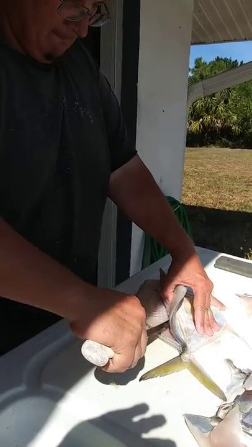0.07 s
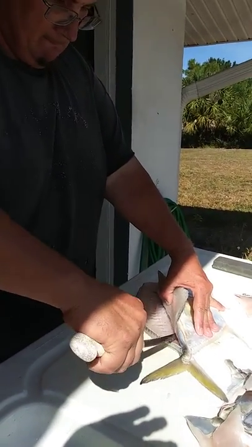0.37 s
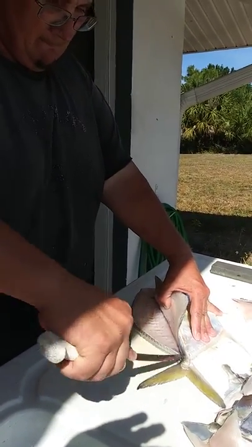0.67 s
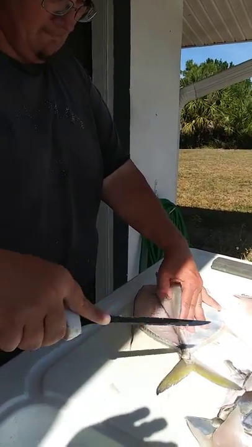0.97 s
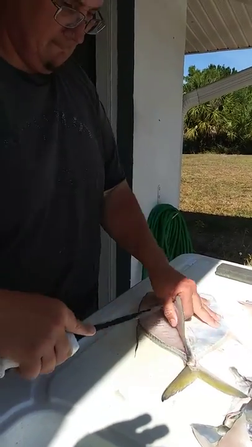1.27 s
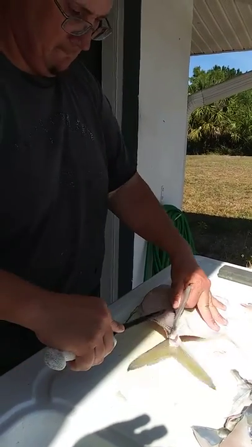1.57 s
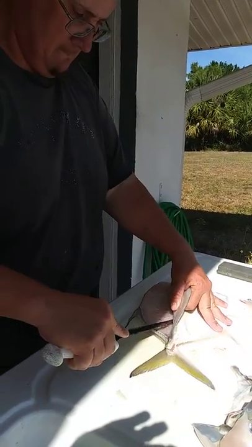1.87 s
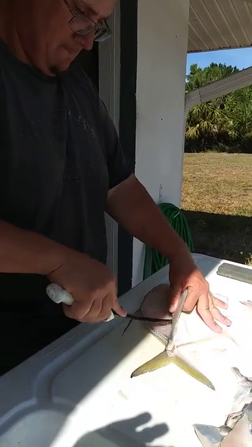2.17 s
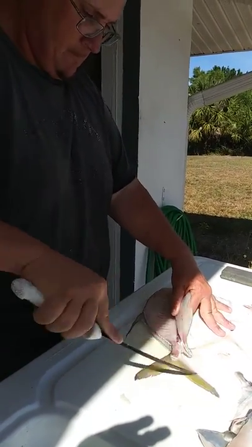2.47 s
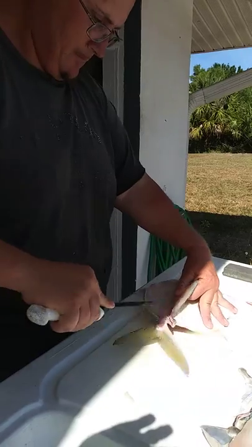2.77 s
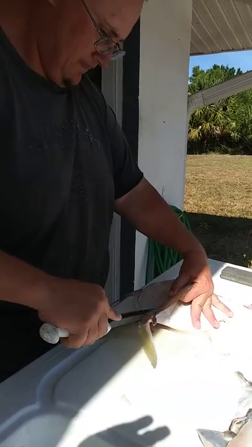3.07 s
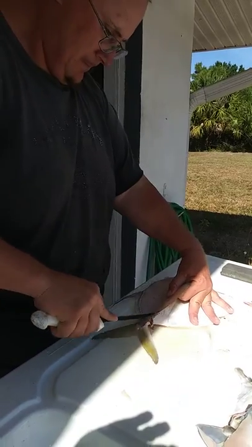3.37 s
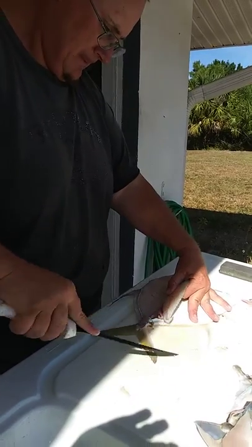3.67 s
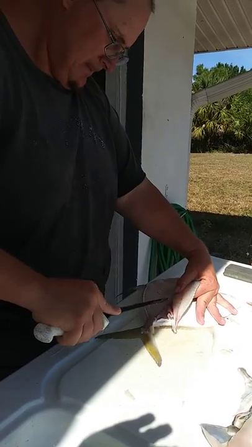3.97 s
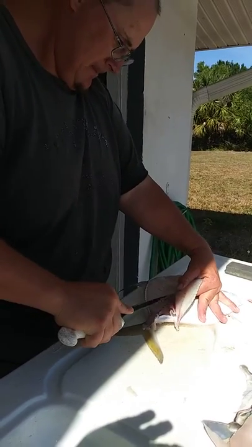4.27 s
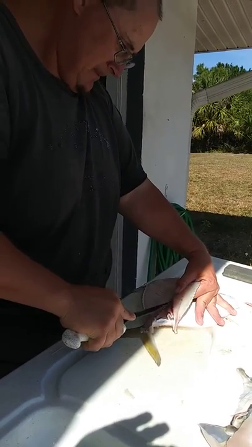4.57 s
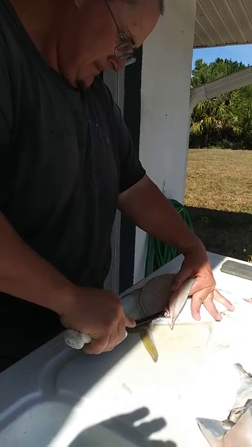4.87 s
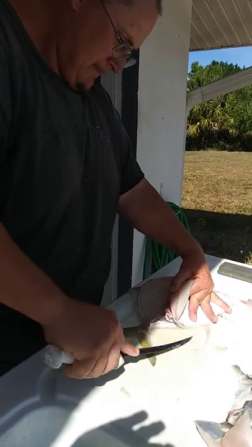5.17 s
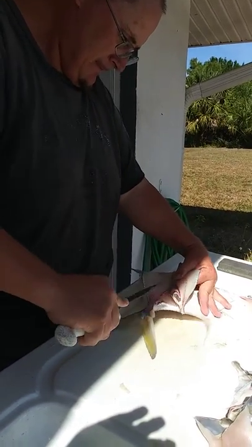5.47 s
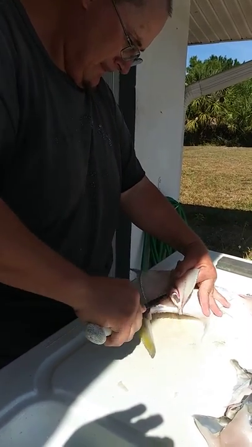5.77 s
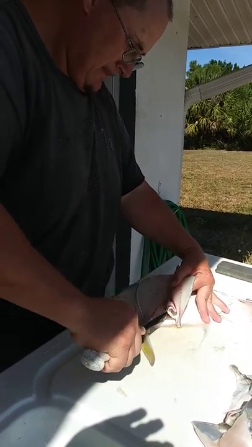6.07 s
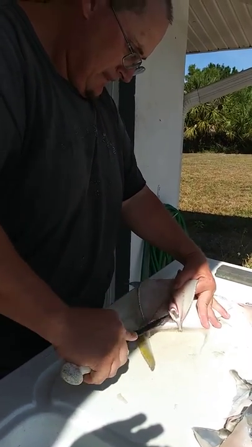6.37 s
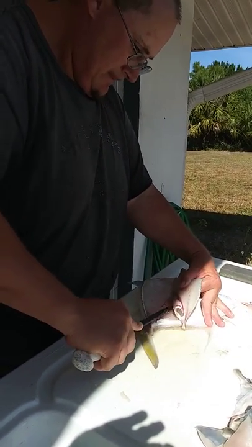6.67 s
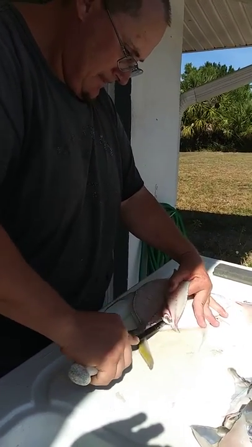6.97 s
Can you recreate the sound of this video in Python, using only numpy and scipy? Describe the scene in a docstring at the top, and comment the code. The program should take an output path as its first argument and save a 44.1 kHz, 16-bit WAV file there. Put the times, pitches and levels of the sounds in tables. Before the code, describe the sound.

A knife rasps and snaps through fish bones on a hollow plastic table, with small wet ticks and faint outdoor air.

```python
"""Filleting a fish on the porch

One microphone, close to a hollow plastic cleaning table under a porch roof. The knife snaps through
ribs and rasps along the backbone; each slip knocks the table top, and the wet flesh ticks.
Farther off lie a soft outdoor rush, a faint insect and a few thin whistles."""
import sys
import numpy as np
from scipy import signal
from scipy.fft import rfft, irfft
from scipy.io import wavfile
from scipy.ndimage import uniform_filter1d

SR = 44100
rng = np.random.default_rng(int(sys.argv[2]) if len(sys.argv) > 2 else 0)


def store_pcm(level_fs):
    """Save levels as 16-bit WAV."""
    pcm = np.round(np.clip(level_fs, -1, 1) * 32767).astype(np.int16)
    wavfile.write(sys.argv[1], SR, np.atleast_2d(pcm).T)


N = 319284
TIME = np.arange(N) / SR
# Knife, bone and table sound in four registers: thud, knock, crack, snap. Each row: low and high edge
# in Hz, first and tail t60 in seconds, then gains in dB for the tail, the table's modes and a fracture.
REGISTERS = [(260, 547, 0.069, 0.24, -9, -0.5, -2.5), (501, 1420, 0.082, 0.11, -34, -2.5, 1),
             (1710, 4940, 0.019, 0.2, -23.5, -13.5, -.5), (5000, 14200, 0.0079, 0.11, -23.5, -11.5, -1)]


def bones(lead_in_db, lead_in_s):
    """Ribs give way one by one under the blade; a brief swell of noise softens the start of each crack."""
    # Each row: start in seconds, then force, brittleness and depth of the push in dB.
    breaks = [(0.0309, -53.5, 8.5, 0), (0.5316, -46.5, -6.5, 2), (0.5727, -34.5, 2.5, -3.5),
              (0.6266, -32.5, -7, -4.5), (0.6843, -39, -8.5, 2.5), (.715, -33, -13, 1.5),
              (0.7212, -36, -2, 1.5), (.7298, -40.5, -5, -4), (0.7366, -38.5, -7, 1), (.828, -48, -5, -0.5),
              (2.245, -39, -2.5, -1.5), (2.26, -43, -3.5, 3.5), (2.3024, -54.5, 2, 2.5),
              (2.451, -48.5, 1.5, 0.5), (2.4874, -35, 8, 2), (2.494, -43, 7, -7), (3.282, -49.5, -7.5, 0.5),
              (3.3908, -42, -5, -3), (3.498, -54, 2, -3.5), (3.6246, -30, -6.5, 3.5),
              (4.4883, -54.5, 2, -6.5), (4.7673, -54, 13, -5), (4.8214, -52, -4, 1),
              (5.187, -25.5, 2.5, 2.5), (5.2842, -48.5, 0, -0.5), (5.6779, -59, 4.5, -2),
              (6.2678, -57, -1, -8.5)]
    # Each row, one per register: offset in dB, then shares of force, brittleness and depth.
    bone_colour = [(-1, 1, 0, 0.84), (-0.5, 1, 0.091, -0.82), (.5, 1, 1, -0.039), (-4, 0.78, 0.43, 1)]
    usual_db = -51
    out, t = np.zeros(N), TIME[:int(lead_in_s * SR)]
    for s, force_db, brittle_db, depth_db in breaks:
        pitches_hz, edge_db = wedge(s)
        colour_db = np.array(bone_colour) @ [1, force_db - usual_db, brittle_db, depth_db]
        levels_db = usual_db + edge_db + colour_db
        clean_db = .25 * (levels_db[2] - levels_db[1])  # less knock on the table, a cleaner snap
        add(out, s, fracture(levels_db, pitches_hz, crack_db=clean_db - 5))
        for (low, high, *_), db in zip(REGISTERS[1:], levels_db[1:]):
            lead_in = band_noise(len(t), low, high) * (t / lead_in_s) ** 2
            add(out, s + .001025 - lead_in_s, from_db(db + lead_in_db) * lead_in)
    return out


def fracture(levels_db, pitches_hz, crack_db, rise_s=.0014, give_s=.0017, tone_q=31):
    """A bone gives, cracks and sets off brief overtones, the table's modes and the porch's short tail."""
    t, attack = TIME[:SR // 4], slice(SR // 100)
    onset = 1 - np.exp(-(t / rise_s) ** 2)
    ring = table_ring(t, spread_db=3) * onset
    crack = 1e-18 + (np.arange(len(t)) == round(give_s * SR))
    out = 0
    for k, (low, high, first_t60, tail_t60, tail_db, modes_db, fracture_db) in enumerate(REGISTERS):
        if k == 0:  # the thud's range depends on where the table is pushed
            low, high = pitches_hz[0] / 1.5, pitches_hz[0] * 1.5
        fading = from_db(-60 * t / first_t60) + from_db(tail_db - 60 * t / tail_t60)
        burst = rng.standard_normal(len(t)) * fading * onset
        parts = band([burst, ring, crack], low, high)
        gains = from_db([0, modes_db, crack_db]) / np.std(parts[:, attack], axis=1)
        sound = gains @ parts
        if k < len(pitches_hz):  # one damped resonance stands out, set by how the blade is wedged
            hz, tone_db = pitches_hz[k], 2 if k == 0 else -1.5
            damping = np.pi * hz / tone_q + np.log(1000) / first_t60 / 2
            tone = np.sin(2 * np.pi * hz * t) * onset * np.exp(-t * damping)
            tone = band(tone, hz / 2, hz * 2, order=2)
            sound += from_db(tone_db) * np.std(sound[attack]) * tone / np.std(tone[attack])
        out += from_db(levels_db[k] + fracture_db) * sound / np.std(sound[attack])
    return out


def wedge(s):
    """How the blade sits at second s sets three pitches and the treble gain of the top register."""
    # Each row: start in seconds, pitches of thud, knock and blade ring in Hz, treble in dB.
    wedges = [(0, 260, 995, 5260, 2.5), (.5, 235, 990, 3010, 0), (.6, 239, 977, 1770, -1),
              (.7, 295, 1170, 4050, 0.5), (2.0, 350, 930, 2270, .5), (2.4, 410, 960, 4150, 4.5),
              (3.0, 330, 870, 2600, 1), (3.55, 398, 1296, 2310, -2.5), (4.2, 410, 850, 2860, 3.5),
              (5.0, 430, 870, 2175, -3)]
    _, *pitches_hz, treble_db = [row for row in wedges if row[0] <= s][-1]
    return pitches_hz, np.array([0, 0, 0, treble_db])


def strokes(ends_db, ring_db, bite_db):
    """Each stroke swells and fades; its slips ring in the blade and, under weight, drum on the table."""
    out, t = np.zeros(N), TIME[:SR // 4]
    for crest, swell_s, fade_s, db, colour_db, ring_hz in blade_moves():
        along = np.interp(t, [0, swell_s, swell_s + fade_s], [-1, 0, 1])
        swell = from_db(ends_db * np.abs(along)) * (1 - along ** 8)
        bite = 1 / (1 + from_db(bite_db - db))  # a hard stroke is grittier and makes the blade ring
        slips = friction(len(t), 2600, spread_db=2 + 3 * bite, judder_db=5.5 + 1.2 * bite, smooth_db=-5)
        slips = blade_ring(slips, ring_hz, width_hz=560, boost_db=-5 + 3 * bite)
        drummed = signal.fftconvolve(slips, table_ring(t, spread_db=1.5))[len(t) // 4:][:len(t)]
        for (low, high, *_, modes_db, _), share_db in zip(REGISTERS, colour_db):
            rasp, body = band([slips, drummed], low, high)
            sound = swell * (rms_one(rasp) + from_db(modes_db + ring_db) * rms_one(body))
            sound *= np.sqrt(np.sum(swell ** 2) / np.sum(sound ** 2))
            add(out, crest - swell_s, from_db(db + share_db) * sound)
    return out


def blade_moves():
    """Light slices over the ribs take one move each; deep cuts along the backbone take three."""
    # Each row: crest and length in seconds, level and weight on the blade in dB.
    slices = [(.04, 0.088, -56, 3.5), (0.224, .11, -50.5, 0), (0.372, 0.11, -61, -0.5),
              (1.52, 0.21, -64, 8.5), (2.423, 0.063, -56.5, 5), (3.468, .12, -60, 0.5),
              (4.773, 0.085, -53.5, 5), (5.095, .11, -59.5, 2), (6.05, .15, -63.5, -5),
              (6.311, 0.081, -58.5, -2.5), (6.923, .1, -62, -8.5), (7.225, .15, -48, -1.5)]
    # Each row: crest and crunch length in seconds, crunch and run-out levels in dB,
    # run-out fade in seconds, weight on the blade and extra thud in dB.
    cuts = [(.756, .062, -39.5, -49.5, 0.095, 1.5, -1.5), (2.276, .06, -48, -54, .075, -5, 3),
            (2.492, 0.061, -38.5, -43.5, 0.05, -1.5, 2), (3.641, .058, -34, -49, 0.047, 3, 5),
            (5.199, .054, -32.5, -50, 0.086, 0.5, -11)]
    free_ring_hz, octaves_per_db = 3080, -.07  # in a slice, weight lowers the blade's ring
    # Each move: crest, swell and fade in seconds, level and register gains in dB, ring in Hz.
    for s, length_s, db, weight_db in slices:
        ring_hz = free_ring_hz * 2 ** (octaves_per_db * weight_db)
        yield s, length_s / 2, length_s / 2, db, stroke_colour(weight_db), ring_hz
    for s, length_s, db, run_out_db, fade_s, weight_db, thud_db in cuts:
        (*_, ring_hz), edge_db = wedge(s)
        approach = stroke_colour(weight_db - 5)  # the edge slides in lightly
        crunch = stroke_colour(weight_db + 1.5) + edge_db + [thud_db, 0, 0, 0]
        run_out = stroke_colour(weight_db + 5.5) + .6 * edge_db  # pressed down on the table
        yield s - .04, .056, .12, db - 18.5, approach, free_ring_hz
        yield s, length_s / 2, length_s / 2, db, crunch, ring_hz
        yield s + .036, .032, fade_s, run_out_db, run_out, ring_hz


def stroke_colour(weight_db):
    """Weight on the blade drives the table and muffles the hiss; gives each register's gain in dB."""
    # Each row, one per register: offset in dB, share of the weight.
    response = [(-0.5, 0.48), (0.5, 1), (0, -0.075), (-4, -0.36)]
    return np.array(response) @ [1, weight_db]


def friction(size, slips_per_s, spread_db, judder_db, smooth_db):
    """Surfaces catch and slip: tiny clicks of uneven size that come in clumps, over a smooth rub."""
    heights = from_db(spread_db * np.minimum(rng.exponential(1, size), 3)) * rng.choice([-1, 1], size)
    slips = rms_one(heights * (rng.random(size) < slips_per_s / SR))
    rub = from_db(smooth_db) * rng.standard_normal(size)
    return (slips + rub) * from_db(judder_db * np.tanh(drift(260, size)))


def blade_ring(x, hz, width_hz, boost_db):
    """The blade's resonance lifts one band out of the rasp."""
    r = np.exp(-np.pi * width_hz / SR)
    gain = (1 - r * r) / 2
    peak = signal.lfilter([gain, 0, -gain], [1, -2 * r * np.cos(2 * np.pi * hz / SR), r * r], x)
    return x + from_db(boost_db) * peak


def table_ring(t, spread_db):
    """The table top rings under the blade; where a touch lands decides how strongly each mode answers."""
    # Each row: pitch in Hz, relative level in dB, t60 in seconds.
    modes = [(267, -8.5, 0.11), (314, 4, 0.052), (391.5, -2.5, 0.18), (423, -7, 0.061), (645, 4.5, 0.047),
             (802, 4.5, 0.04), (904, 0.5, 0.089), (970, -16, 0.098), (1172, -4.5, 0.11), (1252, -6, 0.13),
             (1340, -4, 0.079), (1673, -7, 0.072), (1870, -8.5, 0.23), (2170, 7.5, 0.028), (2760, 4, 0.045),
             (3800, -22, 0.056), (3850, -5, 0.051), (4150, -2, 0.045), (5110, 1, 0.051), (9200, -7, 0.023)]
    hz, db, t60 = np.transpose(modes)[:, :, None]
    strength = from_db(db + spread_db * rng.standard_normal(db.shape)) * rng.choice([-1, 1], db.shape)
    return np.sum(strength * from_db(-60 * t / t60) * np.sin(2 * np.pi * hz * t), axis=0)


def table_sway(knife, low_db, deep_db):
    """Every push also shakes the whole table a little, low down."""
    push = np.sqrt(np.maximum(uniform_filter1d(band(knife, 150, 2300) ** 2, SR // 60), 0))
    low = from_db(low_db) * band_noise(N, 122, 215)
    deep = from_db(deep_db) * band_noise(N, 20, 100, order=2)
    return push * (low + deep)


def wet_ticks(t60, rise_s, band_ratio):
    """Small wet films burst on flesh and scales, each with a brief pitch."""
    # Each row: start in seconds, pitch in Hz, peak level in dB.
    ticks = [(0.464, 3400, -47.5), (0.871, 5680, -46.5), (2.121, 7100, -56), (4.014, 3440, -37.5),
             (4.18, 3500, -50.5), (5.679, 5770, -52), (7.038, 3700, -47.5)]
    out, t = np.zeros(N), TIME[:SR // 20]
    for s, hz, db in ticks:
        fizz = band_noise(len(t), hz / band_ratio, hz * band_ratio, order=2)
        envelope = from_db(-60 * t / t60) * (1 - np.exp(-t / rise_s))
        pop = (np.sin(2 * np.pi * hz * t) + .5 * fizz) * envelope
        add(out, s, from_db(db) * pop / np.abs(pop).max())
    return out


def handling(crackle_db, bump_db):
    """Hands and flesh shift all the while: faint sticky crackle and soft bumps."""
    sticking = friction(N, slips_per_s=70, spread_db=4, judder_db=2, smooth_db=-20)
    crackle = band(sticking, 2000, 4700, order=1)
    bumps = band_noise(N, 155, 383) * from_db(3.9 * drift(28))
    return from_db(crackle_db) * rms_one(crackle) + from_db(bump_db) * rms_one(bumps)


def porch(x):
    """Table top, post and roof each throw the sound back to the microphone once."""
    # Each row: delay in seconds, gain in dB.
    echoes = [(.0021, -29), (.0064, -22), (0.0113, -21.5)]
    out = x.copy()
    for delay_s, db in echoes:
        add(out, delay_s, from_db(db) * x)
    return out


def outdoor_air(level_db):
    """A far, even rush of air from beyond the porch."""
    # Each row: frequency in Hz, relative spectral density in dB.
    spectrum = [(20, -26), (90, -33), (130, -18.5), (200, -11.5), (350, -7.5), (550, 3), (720, 0.5),
                (930, -1), (1150, -4.5), (1500, -10.5), (4300, -17), (6300, -28), (8300, -28), (10000, -24),
                (16000, -28)]
    hz, db = np.transpose(spectrum)
    bins = np.maximum(np.fft.rfftfreq(N, 1 / SR), 1)
    colour = from_db(np.interp(np.log(bins), np.log(hz), db))
    return from_db(level_db) * rms_one(irfft(rfft(rng.standard_normal(N)) * colour, N))


def insect():
    """An insect's thin shimmer rises and sinks in the background."""
    # Each row: time in seconds, level in dB.
    levels = [(0, -105), (3.8, -90), (5.4, -79), (6.6, -89), (7.24, -91)]
    return from_db(np.interp(TIME, *np.transpose(levels))) * band_noise(N, 9680, 9900, order=1)


def whistles(band_ratio):
    """Faint, thin whistles come and go: narrow bands of hiss that swell and fade."""
    # Each row: crest and length in seconds, pitch in Hz, level in dB.
    swells = [(0.999, 0.65, 5000, -69.5), (1.1, 0.61, 8700, -75), (4.25, 0.26, 4760, -72),
              (5.725, 0.1, 7360, -75), (5.948, 0.47, 4800, -71), (6.92, .09, 5350, -67)]
    out = np.zeros(N)
    for s, length_s, hz, db in swells:
        swell = np.hanning(int(length_s * SR))
        hiss = band_noise(SR, hz / band_ratio, hz * band_ratio, order=2)
        add(out, s - length_s / 2, from_db(db) * swell * hiss[:len(swell)])
    return out


def from_db(db):
    return 10 ** (np.asarray(db) / 20)


def rms_one(x):
    return x / np.sqrt(np.mean(x ** 2) + 1e-20)


def band(x, low_hz, high_hz, order=3):
    """Causal band-pass."""
    sos = signal.butter(order, [low_hz, min(high_hz, .45 * SR)], "band", fs=SR, output="sos")
    return signal.sosfilt(sos, x)


def band_noise(size, low_hz, high_hz, order=3):
    """Band-passed noise with rms 1."""
    return rms_one(band(rng.standard_normal(size), low_hz, high_hz, order))


def drift(rate_hz, size=N):
    """A random wander with a spread of about 1."""
    return np.interp(TIME[:size] * rate_hz, np.arange(size), rng.standard_normal(size))


def add(track, s, sound):
    """Mixes a sound into the track from second s on."""
    at = int(np.clip(round(s * SR), 0, N - 1))
    track[at:at + len(sound)] += sound[:N - at]


def scene():
    """Knife, table and fish up close, the outdoors behind them, in mono."""
    cracks = bones(lead_in_db=-8, lead_in_s=.006)
    knife = porch(cracks + strokes(ends_db=-13.5, ring_db=3.5, bite_db=-46))
    fish = wet_ticks(t60=.0094, rise_s=.00072, band_ratio=1.23)
    fish += handling(crackle_db=-78.5, bump_db=-67.5)
    sway = table_sway(knife, low_db=-23, deep_db=-50)
    background = outdoor_air(level_db=-57.15) + insect() + whistles(band_ratio=1.063)
    return (knife + sway + fish + background)[None]


def record(dry):
    """The microphone's signal is cut off steeply above 16 kHz."""
    return signal.sosfilt(signal.ellip(10, .1, 70, 16000, fs=SR, output="sos"), dry)


dry = scene()
out = record(dry)
store_pcm(out)
```